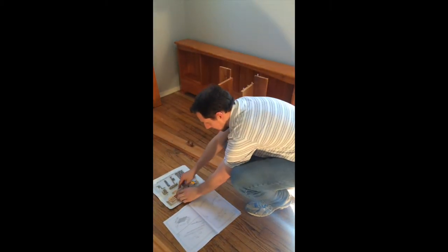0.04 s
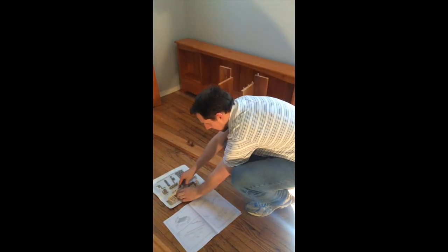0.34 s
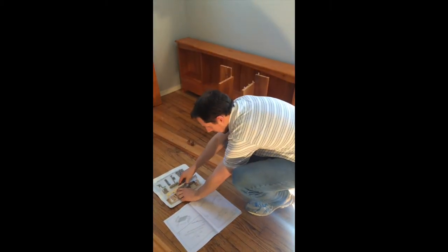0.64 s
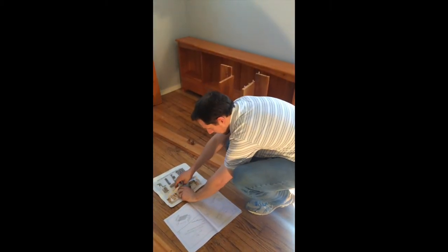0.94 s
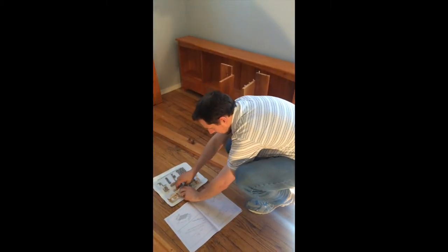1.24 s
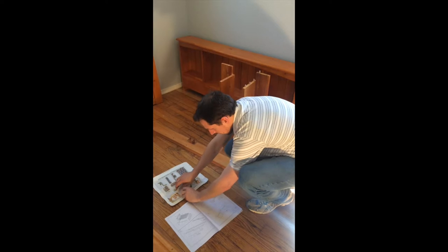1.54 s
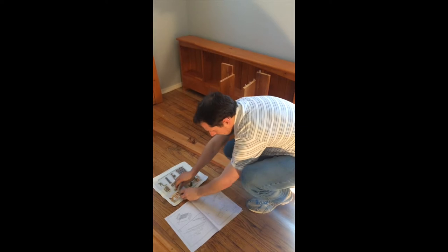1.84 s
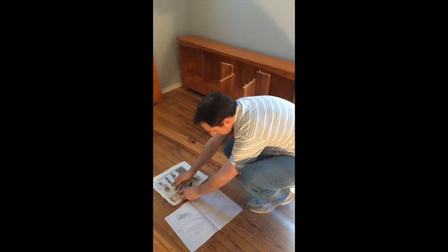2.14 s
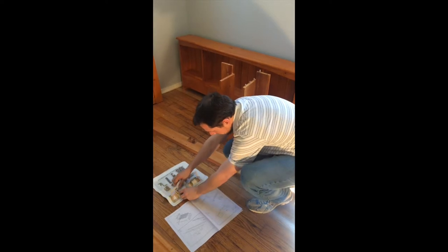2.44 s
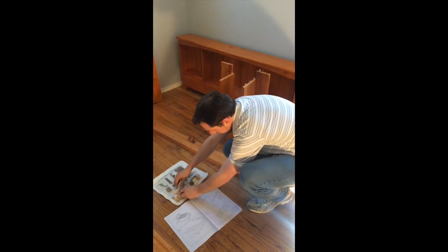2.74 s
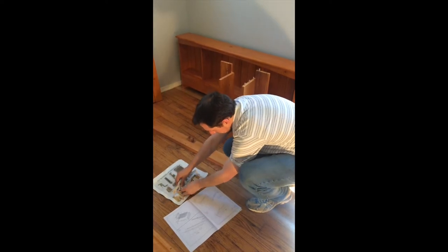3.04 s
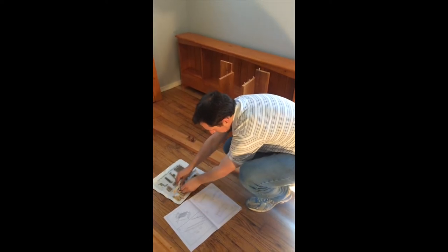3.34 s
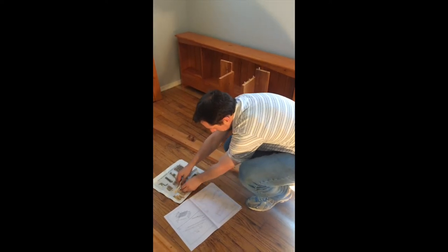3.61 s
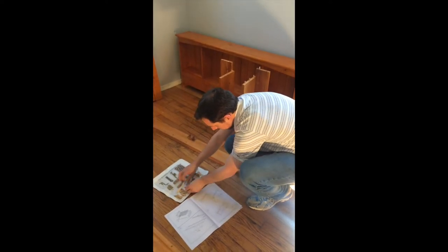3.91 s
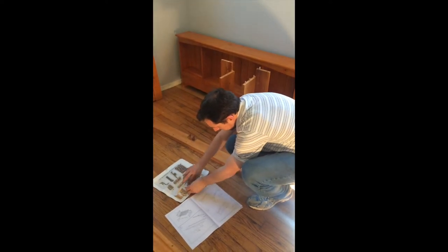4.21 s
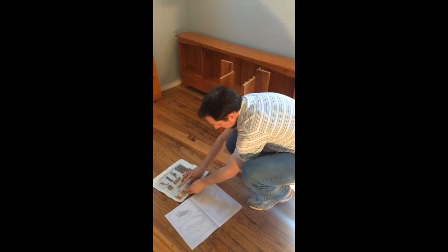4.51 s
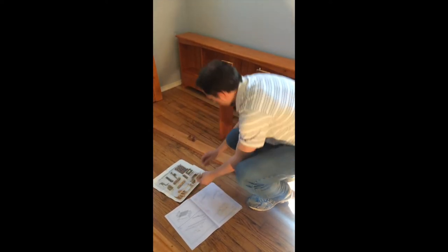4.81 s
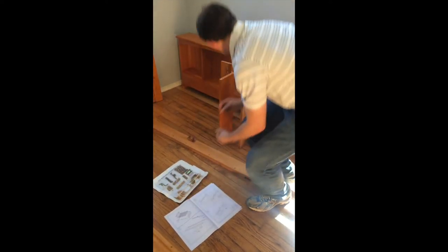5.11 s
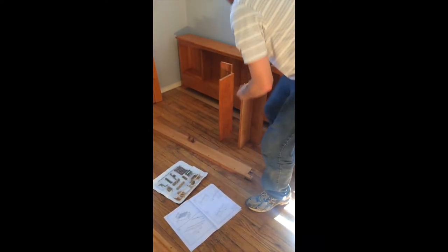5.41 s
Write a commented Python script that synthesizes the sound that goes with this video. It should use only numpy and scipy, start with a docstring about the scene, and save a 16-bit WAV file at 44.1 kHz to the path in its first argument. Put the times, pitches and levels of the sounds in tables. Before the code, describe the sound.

Hands sort through small hardware in a stiff plastic tray on a wooden floor. The plastic buckles with sharp, irregular snaps and the tray rocks with hollow knocks, while fingers scrape faintly and small parts rattle and drop with bright ticks. Near the end, soft floorboard thuds join the last snaps, and the tray goes still as the person rises. A phone picks it up from a couple of metres away in a bare, slightly echoing room.

```python
"""Hands pick assembly hardware out of a stiff plastic tray on the wooden floor of a bare room.
From the start, fingers rummage and scrape over the plastic while the tray's pockets buckle and snap.
Loose parts rattle after each jolt, the tray rocks with hollow knocks, and small parts drop with a tick.
From four seconds on, soft thuds join the last snaps; then the tray rests and the person gets up.
A phone hears it all from a couple of metres away."""
import sys
import numpy as np
from scipy import signal
from scipy.fft import rfft, irfft
from scipy.io import wavfile

SR = 44100
rng = np.random.default_rng(int(sys.argv[2]) if len(sys.argv) > 2 else 0)


def transcribe(signal):
    """Save signal, clipped to [-1, 1], as a 16-bit WAV file at the path in sys.argv[1]."""
    frames = np.atleast_2d(signal).T
    limited = np.clip(frames, -1, 1)
    pcm = np.round(limited * 32767).astype(np.int16)
    wavfile.write(sys.argv[1], SR, pcm)


N = 245460
TIME = np.arange(N) / SR
TOP_HZ = 15300  # upper edge of the band

# room tone, the still air: (frequency [Hz], relative level [dB])
AIR_SPECTRUM = [(20, -28.5), (38, -21.5), (52, 2.5), (80, -3.5), (180, -8.5), (420, -11), (830, -15.5),
                (2500, -21.5), (3500, -15.5), (5000, -28), (9000, -36.5), (15000, -44)]
# reverb time of the bare room: (frequency [Hz], t60 [s])
ROOM_DECAY = [(150, 0.31), (500, 0.5), (1000, 0.55), (1700, 0.58), (3400, 0.42), (6000, 0.44),
              (12000, 0.36)]
# soft thuds through the floorboards: (time [s], level [dB], pitch [Hz])
FLOOR_THUDS = [(4.006, -43, 80), (4.642, -40.5, 180), (5.059, -49.5, 75.2), (5.135, -52, 122),
               (5.245, -52.5, 176), (5.32, -55, 99)]
# faint rummaging of the hands: (start [s], end [s], level [dB])
RUMMAGE_SPANS = [(0, 1.37, -52), (1.5, 3.16, -56.5), (3.53, 4.85, -56.5)]
# a finger pushes parts across the plastic: (time [s], length [s], level [dB], metal send [dB])
FINGER_STROKES = [(0.578, 0.069, -46.5, -18.5), (1.98, 0.021, -69, 16), (2.805, 0.043, -33.5, 2),
                  (3.05, 0.11, -52, -5)]
# modes of the loose screws: (frequency [Hz], width [Hz], gain [dB])
SCREW_MODES = [(4630, 510, 2.5), (9700, 880, 14), (11290, 830, 7.5), (14800, 730, 15.5)]
# a single small part drops: (time [s], level [dB])
PART_DROPS = [(0.3077, -0.5), (.535, -15), (.551, -15), (.566, -11.5), (.880, -14), (2.2281, 0.5),
              (2.895, -3), (3.007, -5.5), (3.25, -15), (3.2923, -12.5), (3.5407, -0.5), (4.421, -16)]
# the tray rocks and knocks hollowly: (time [s], level [dB], pitch [Hz])
TRAY_KNOCKS = [(.098, 3, 1600), (.174, 17, 966), (.598, 0, 1280), (.762, 6, 930), (1.026, 15.5, 763),
               (1.181, 9.5, 1420), (1.191, 8, 355), (1.580, 19, 820), (1.655, 12.5, 396),
               (2.240, 19.5, 1240), (2.269, 13.5, 1300), (2.345, 18.5, 670), (2.362, 17, 640),
               (2.394, 19.5, 714), (3.576, 9, 1340), (4.266, 10, 1370), (4.276, 3.5, 2130),
               (4.649, 13, 676), (4.669, 8.5, 356)]
# a pocket buckles and snaps: (time [s], level [dB], direct sound [dB], body [dB],
# treble slope [dB/octave], pocket pitch [Hz], pocket width [Hz], pocket ring [dB])
POCKET_SNAPS = [ (0.0922, 4, -1.5, -35, -2.5, 3480, 400, 3), (.168, 8.5, 2.5, -24, -1, 2050, 400, 3),
                (.939, 9.5, -4.5, -1, -7, 1290, 250, -5), (1.0026, 14, 0, -11, 2.5, 3400, 800, 4.5),
                (1.218, 9.5, -1, -7, -19, 1300, 300, -45), (1.5638, 14, -2, -1, 2.5, 1685, 320, 8.5),
                (2.233, 12.5, -4, -5.5, -4, 1380, 210, 8), (2.3312, 3, -1, 2, 0, 690, 400, 16.5),
                (2.428, 8.5, 0.5, 3.5, -1.5, 3400, 600, -14), (2.829, 6.5, -3, -3.5, 0, 1300, 400, -4.5),
                (3.0231, -1, -3, 4, -2, 960, 594, 5.5), (3.5453, 6.5, -5.5, -1, -2, 2620, 700, 0.5),
                (3.701, 4.5, 1.5, -10.5, -5.5, 800, 446, 7.5),
                (4.008, 12.5, -4.5, 0.5, -1.5, 3630, 500, -8), (4.264, -6.5, -2, 6, -1, 2140, 790, 7.5),
                (4.634, 13.5, -3, 4.5, -1.5, 1520, 130, 6), ]
# modes of the whole tray: (frequency [Hz], width [Hz], gain [dB])
TRAY_MODES = [(350, 9.9, -18), (640.7, 11, 1), (720, 22, -2.5), (787, 16, 0), (899, 4.7, -21),
              (1122, 13, 5), (1270, 65, 0), (1520, 16, -14.5), (1820, 16, -23.5), (2050, 26, -13),
              (2236, 12, -4.5), (3400, 24, -18.5), (3604, 72, -6)]
# tone of a click on the tray, with the microphone's presence peak: (frequency [Hz], gain [dB])
CLICK_EQ = [(50, -21.5), (150, -12.5), (300, -7), (600, -4), (1000, -5), (2000, -1), (2700, -2),
            (3400, 4.5), (4000, -1.5), (4700, -13), (6000, -20), (8000, -32.5), (11000, -42.5),
            (15000, -60)]


def undb(db):
    """Decibels to gain."""
    return 10 ** (np.asarray(db) / 20)


def unit_rms(x):
    """Scale to an rms of one."""
    return x / np.sqrt(np.mean(x ** 2))


def unit_energy(x):
    """Scale to the energy of a single unit tick."""
    return x / np.sqrt(np.sum(x ** 2))


def curve_at(points, hz):
    """Read a curve of (frequency [Hz], value) points on a log-frequency axis."""
    point_hz, value = np.transpose(points)
    return np.interp(np.log(hz + 1), np.log(point_hz), value)


def equalise(x, points, size=2048):
    """Minimum-phase EQ through (frequency [Hz], gain [dB]) points: no pre-ring ahead of a click."""
    hz = np.arange(size // 2 + 1) * SR / size
    cepstrum = irfft(np.log(undb(curve_at(points, hz))))
    cepstrum[1:size // 2] *= 2
    cepstrum[size // 2 + 1:] = 0
    impulse_response = irfft(np.exp(rfft(cepstrum)))
    return signal.fftconvolve(x, impulse_response)[:len(x)]


def ring(x, hz, width_hz):
    """One resonance, unity gain at its centre."""
    return signal.lfilter(*signal.iirpeak(hz, hz / width_hz, fs=SR), x)


def add(track, time_s, sound):
    """Mix a sound in at its cue."""
    start = int(time_s * SR)
    track[start:start + len(sound)] += sound[:N - start]


def room_tone(level_db=-63.5):
    """Still air: a faint, steady bed of rumble and hiss."""
    hz = np.arange(N // 2 + 1) * SR / N
    spectrum = rfft(rng.standard_normal(N)) * undb(curve_at(AIR_SPECTRUM, hz))
    return undb(level_db) * unit_rms(irfft(spectrum, N))


def room(x, direct_db=0, near_db=-6, early_db=-9, tail_db=-2, low_cut_hz=300, high_cut_hz=8000,
         wall_s=.0058, early_decay_s=.0071, reflections_per_s=2400, build_cycles=6, size=32768):
    """Direct sound, early echoes, then a diffuse tail; each spot on the tray has its own wall paths."""
    t = TIME[:size]
    hz, age, noise = signal.stft(rng.standard_normal(size), SR, nperseg=256)
    build = 1 - np.exp(-age * hz[:, None] / build_cycles)  # lows take longer to fill the room
    fade = np.exp(-np.log(1000) * age / curve_at(ROOM_DECAY, hz)[:, None])
    tail = signal.istft(noise * build * fade)[1][:size] * np.minimum(t / wall_s, 1)
    echoes = rng.choice([-1, 1], size) * (rng.random(size) < reflections_per_s / SR)
    early = echoes * np.exp(-t / early_decay_s) * (t > wall_s / 10)
    # the nearest wall repeats the first arrival; both lack bass and the hands shade their treble
    near = (t == 0) + .5 * np.roll(t == 0, int(wall_s * SR))
    near = signal.lfilter(*signal.butter(1, [low_cut_hz, high_cut_hz], "band", fs=SR), near)
    reverb = undb(early_db) * unit_energy(early) + undb(tail_db) * unit_energy(tail)
    return signal.fftconvolve(x, undb(direct_db + near_db) * near + reverb)[:N]


def floor_thuds(decay_s=.018, attack_s=.006):
    """Weight shifts on the boards, which answer with a short low note."""
    out, t = np.zeros(N), TIME[:SR // 4]
    envelope = np.exp(-t / decay_s) * (1 - np.exp(-t / attack_s))
    for time_s, db, hz in FLOOR_THUDS:
        add(out, time_s, undb(db) * np.sin(2 * np.pi * hz * t) * envelope)
    return out


def gesture(start_s, end_s, attack_s, release_s):
    """Envelope of a hand move: swell up to the start, hold, and fall away after the end."""
    return np.exp(-np.maximum(start_s - TIME, 0) / attack_s - np.maximum(TIME - end_s, 0) / release_s)


def stick_slip(ticks_per_s, scatter_db=3.0):
    """Friction catches and lets go: a dense grain of uneven ticks."""
    sizes = undb(scatter_db * np.minimum(rng.exponential(1, N), 5)) * rng.choice([-1, 1], N)
    return unit_rms(sizes * (rng.random(N) < ticks_per_s / SR))


def finger_scrapes(gain_db=4, rummage_fade_s=.083, rummage_metal_db=-16.5):
    """Light rummaging and firmer strokes on plastic; where screws rub together, their modes sizzle."""
    pressure = np.max([undb(db) * gesture(start_s, end_s, rummage_fade_s, rummage_fade_s)
                       for start_s, end_s, db in RUMMAGE_SPANS], axis=0)
    on_plastic = pressure * stick_slip(ticks_per_s=700)
    on_metal = undb(rummage_metal_db) * on_plastic
    grain = stick_slip(ticks_per_s=1200)
    for time_s, length_s, db, metal_db in FINGER_STROKES:
        stroke = undb(db) * gesture(time_s, time_s + length_s, attack_s=.018, release_s=.02) * grain
        on_plastic += stroke
        on_metal += undb(metal_db) * stroke
    sizzle = sum(undb(db) * ring(on_metal, hz, width_hz) for hz, width_hz, db in SCREW_MODES)
    return undb(gain_db) * room(on_plastic + sizzle)


def rattle(bounce_db=-15, spread_s=.018, count=5, size=8192):
    """A jolt, then a few weaker ticks as loose parts fall back."""
    delay_s = rng.exponential(spread_s, count)
    strength = 2 * rng.random(count) - 1
    ticks = np.zeros(size)
    ticks[0] = 1
    ticks[np.clip((delay_s * SR).astype(int), 1, size - 1)] += undb(bounce_db) * strength
    return unit_energy(ticks)


def part_drops(body_db=-7, mid_db=-3, treble_db=9):
    """A light, hard part lands with a bright tick."""
    out = np.zeros(N)
    bright_eq = [(400, body_db), (1100, mid_db), (3600, 0), (TOP_HZ, treble_db)]
    for time_s, db in PART_DROPS:
        add(out, time_s, room(undb(db) * equalise(rattle(), bright_eq), direct_db=1))
    return out


def tray_knocks(note_q=4.7, click_db=-21, body_db=3, presence_db=-5, treble_db=-22):
    """The tray rocks: a blunt contact sounds one hollow note of the shell and a little dull click."""
    out = np.zeros(N)
    blunt_eq = [(400, body_db), (1100, 0), (3600, presence_db), (TOP_HZ, treble_db)]
    for time_s, db, hz in TRAY_KNOCKS:
        jolt = undb(db) * equalise(rattle(), blunt_eq)
        knock = ring(jolt, hz, hz / note_q) + undb(click_db) * jolt
        add(out, time_s, room(knock, direct_db=3))
    return out


def pocket_snaps(body_hz=400, mid_hz=1100, knee_hz=3600, rebound_s=.006, rebound_db=-6.5):
    """A pocket buckles and rings at its own pitch, then its wall springs back with a softer snap."""
    out = np.zeros(N)
    for time_s, db, direct_db, body_db, slope_db, hz, width_hz, pocket_db in POCKET_SNAPS:
        # a deep flex adds body, a hard contact tilts the treble up
        treble_db = slope_db * np.log2(TOP_HZ / knee_hz)
        snap_eq = [(body_hz, body_db), (mid_hz, 0), (knee_hz, 0), (TOP_HZ, treble_db)]
        jolt = undb(db) * equalise(rattle(), snap_eq)
        snap = jolt + undb(pocket_db) * ring(jolt, hz, width_hz)
        add(out, time_s, room(snap, direct_db))
        add(out, time_s + rebound_s, undb(rebound_db) * room(snap, direct_db))
    return out


def tray_shell(contacts, smear_hz=3300, smear_width_hz=1500):
    """Every contact rings the whole tray; the thin shell smears a click over about a millisecond."""
    smeared = contacts - 2 * ring(contacts, smear_hz, smear_width_hz)  # all-pass: delay, no colour
    ringing = sum(undb(db) * ring(smeared, hz, width_hz) for hz, width_hz, db in TRAY_MODES)
    return equalise(smeared + ringing, CLICK_EQ)


def scene():
    """Mono mix: the tray up front, over the floorboards and the room tone."""
    contacts = pocket_snaps() + tray_knocks() + part_drops() + finger_scrapes()
    return (tray_shell(contacts) + floor_thuds() + room_tone())[None]


def record(dry):
    """The phone takes off the very top with a steep high cut."""
    return signal.sosfilt(signal.ellip(10, .2, 70, TOP_HZ, fs=SR, output="sos"), dry)


dry = scene()
out = record(dry)
transcribe(out)
```